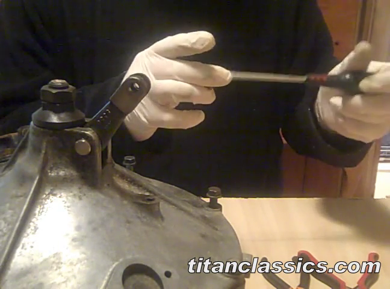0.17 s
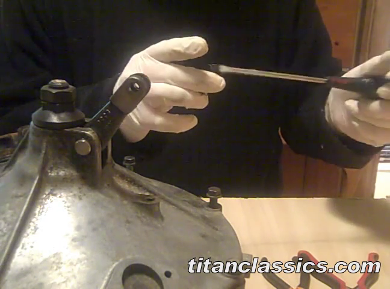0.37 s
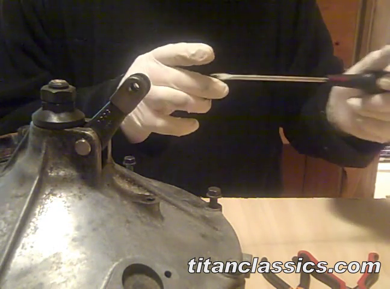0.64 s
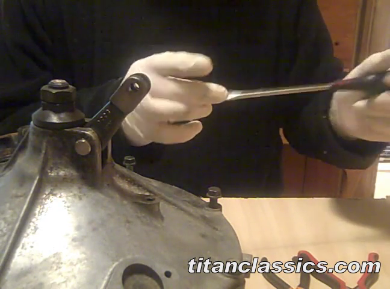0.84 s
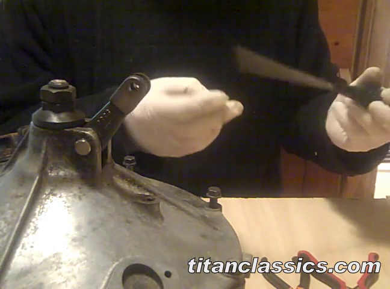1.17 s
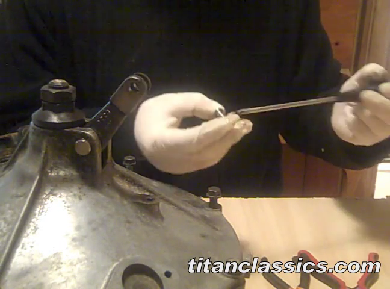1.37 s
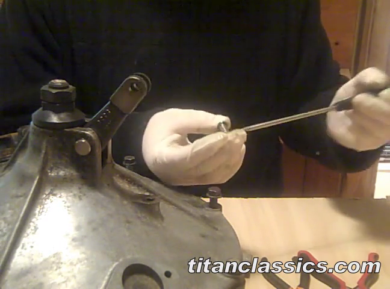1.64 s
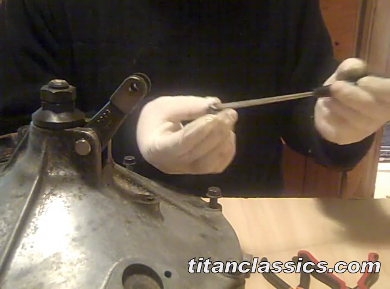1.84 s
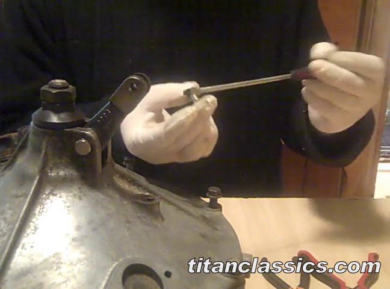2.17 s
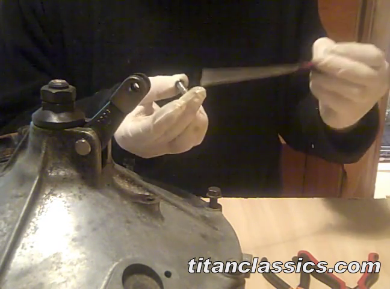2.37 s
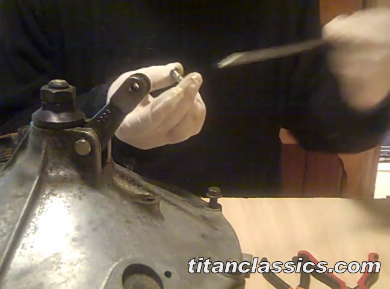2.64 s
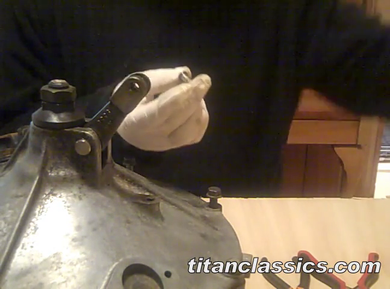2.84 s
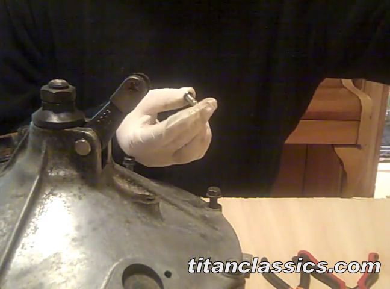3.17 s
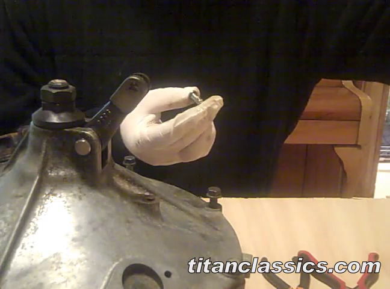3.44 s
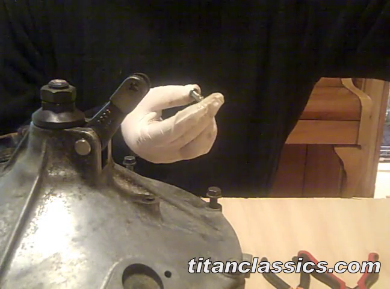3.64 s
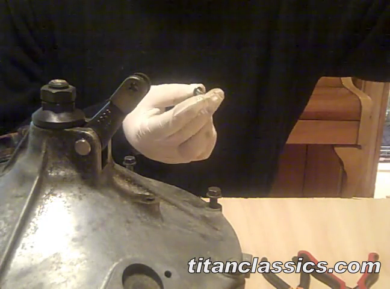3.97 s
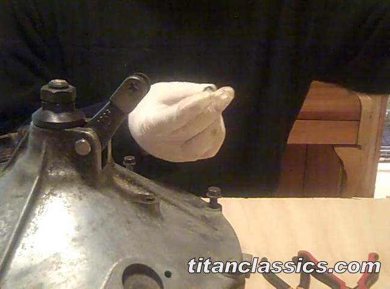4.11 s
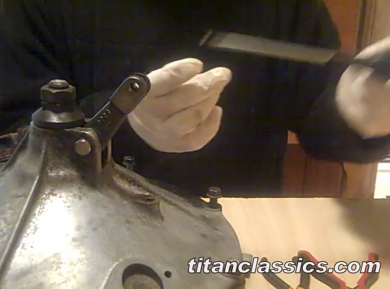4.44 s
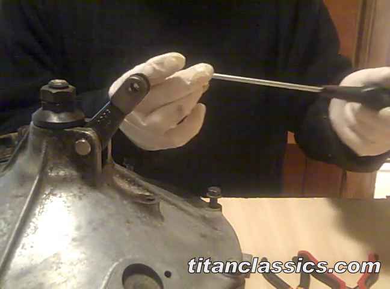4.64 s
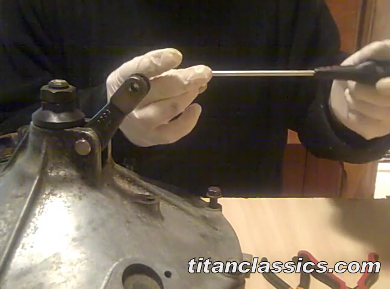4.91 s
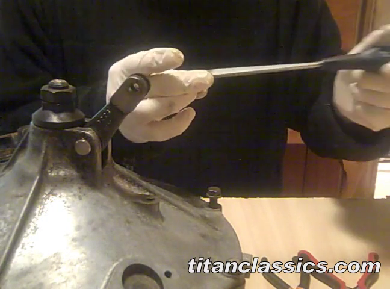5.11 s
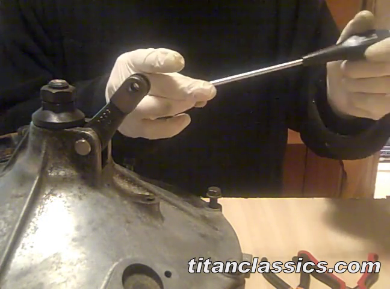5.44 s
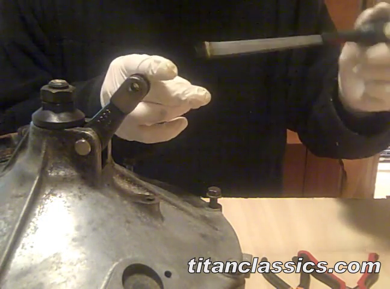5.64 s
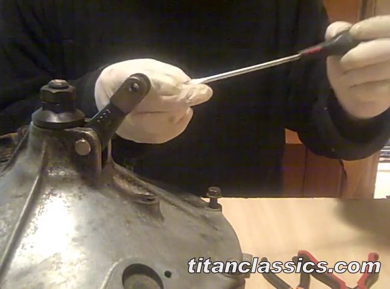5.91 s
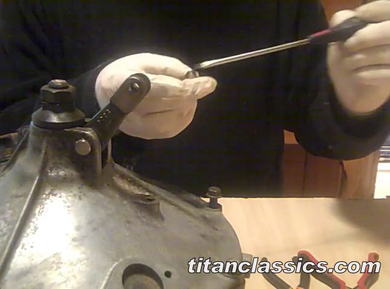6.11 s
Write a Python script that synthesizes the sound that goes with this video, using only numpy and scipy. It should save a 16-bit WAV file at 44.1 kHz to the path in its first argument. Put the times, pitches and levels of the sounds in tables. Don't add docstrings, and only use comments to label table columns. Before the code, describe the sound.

Faint greasy rubbing, then dry metallic clicks as a blade tip touches and skids on a little pin. Isolated hard taps alternate with softer nudges and tiny rattling ticks. A low, muffled wooden thump comes just past halfway, followed by small knocks and a brief lull, then a crunchy smear and renewed clicking. A nearby camera microphone hears it all over quiet, hissy room tone.

```python
import sys
import numpy as np
from scipy import signal
from scipy.fft import rfft, irfft, next_fast_len
from scipy.io import wavfile
from scipy.ndimage import map_coordinates

SR = 44100
rng = np.random.default_rng(int(sys.argv[2]) if len(sys.argv) > 2 else 0)


def materialize(psi):
    bounded = np.clip(np.atleast_2d(psi).T, -1, 1)
    quanta = np.round(bounded * 32767).astype(np.int16)
    wavfile.write(sys.argv[1], SR, quanta)


def ratio_of_db(decibels):
    return 10 ** (np.asarray(decibels, float) / 20)


N = 277080

# (time [s], peak [dB], tip ring [Hz], sideways bend [dB], glancing crunch [dB])
HARD_TAPS = [
    (0.2075, -16.5, 5450, -20, -39),
    (0.2566, -19, 5970, -17.5, -14),
    (0.2652, -19.5, 6350, -34, -12),
    (0.821, -15.5, 5940, -23, -20),
    (1.9097, -5.5, 6050, -20, -31),
    (2.539, -15, 7230, -20, 7),
    (4.2194, -11, 6040, -22, -9),
    (4.6293, -11.5, 7360, -27, -12),
    (4.969, -15, 6800, -26, -22),
    (5.5043, -16.5, 7050, -27, -19),
]
# (time [s], peak [dB], tip ring [Hz], sideways bend [dB])
NUDGES = [(0.0794, -34.5, 7100, -14), (0.9602, -29, 6740, -15), (1.0455, -30, 5800, -9),
          (1.5414, -27.5, 6900, -10), (1.9884, -31, 5570, -13), (3.2586, -31, 6400, -15),
          (3.3071, -24.5, 6340, -30), (3.3775, -37.5, 5160, -8), (3.8405, -32, 5460, -23.5),
          (4.0663, -37, 7100, -15.5), (5.09, -33, 5900, -9.5), (5.208, -29, 6600, -20),
          (5.6017, -27.5, 6300, -23), (5.7976, -28, 5660, -22), (5.8522, -32.5, 6800, -14.5)]
# (time [s], peak [dB], tip ring [Hz])
TICKS = [(0.136, -46, 5700), (1.0846, -38, 6140), (1.1254, -34, 6950), (1.16, -40.5, 6260),
         (2.165, -34.5, 6200), (2.2477, -44.5, 6500), (2.2846, -39, 6000), (2.759, -35, 7200),
         (2.778, -33, 7030), (2.8412, -34.5, 7360), (3.318, -34, 6050), (3.6916, -46, 4730),
         (4.1448, -34.5, 6400), (4.643, -30, 6800), (4.6563, -27, 6700), (4.659, -23.5, 6700),
         (5.29, -40, 6400), (6.026, -32.5, 7100), (5.8055, -52, 6200), (6.121, -38, 6020)]
# (time [s], pressure [dB])
DRAG_PRESSURE = [(0.0, -43.5), (0.19, -45), (0.38, -57.5), (0.89, -54), (1.0, -66.5), (1.22, -48),
                 (1.77, -52.5), (2.22, -46), (2.71, -56), (3.32, -51), (3.57, -60), (4.13, -54.5),
                 (4.29, -33), (4.46, -51), (5.18, -67), (5.7, -50), (5.96, -47), (6.28, -60.5)]
# (end [s], length [s], level [dB], sideways bend [dB])
STROKES = [(0.034, 0.18, -57, -3), (0.3, 0.013, -59, -6), (0.335, 0.022, -38.5, -9.5),
           (0.613, 0.067, -37, -12), (0.871, 0.039, -38, -9), (0.892, 0.035, -38, -17),
           (1.295, 0.012, -53, -9), (1.325, 0.029, -67, 5.5), (1.659, 0.096, -55, 3),
           (1.69, 0.048, -38.5, -8.5), (1.698, 0.028, -34, -9.5), (2.012, 0.049, -33.5, -9),
           (2.313, 0.033, -53, -21), (2.339, 0.023, -36.5, -21), (2.366, 0.046, -37.5, -15),
           (2.657, 0.072, -50, -10), (2.832, 0.52, -54.5, -11), (3.318, 0.047, -53.5, 2),
           (3.816, 0.14, -51.5, -12), (4.21, 0.18, -53.5, -6), (4.706, 0.052, -54, -2),
           (4.733, 0.075, -37, -14), (4.78, 0.094, -55, -9), (5.059, 0.054, -42.5, -11),
           (5.325, 0.068, -45.5, -10.5), (5.589, 0.059, -45.5, -8.5), (5.708, 0.07, -56.5, -6),
           (5.896, 0.014, -48, -5), (5.977, 0.051, -51, -10.5), (6.027, 0.094, -49.5, -9.5)]
# (time [s], t60 [s], level [dB], ring [Hz], width [Hz])
SKIDS = [(.213, 0.44, -63, 6000, 2000), (.271, 0.44, -58, 6400, 2000), (1.917, .5, -42, 6960, 2560),
         (2.336, 0.25, -34, 5930, 450), (2.545, 0.32, -55, 6770, 3000), (3.265, 1, -51, 6300, 2500),
         (3.845, .5, -49.5, 5460, 1020), (4.072, 0.55, -58, 6700, 1970), (4.226, 0.3, -30.5, 6330, 1500),
         (4.636, 0.67, -39, 6860, 2000), (4.63, 0.12, -40.5, 2240, 140), (4.69, 0.46, -48.5, 2195, 140),
         (4.633, 0.15, -45, 1046, 80), (4.70, 0.27, -41, 4500, 900), (4.975, 0.24, -53, 7160, 1990),
         (5.511, 0.74, -49, 7160, 2000)]
# (time [s], bench ring [dB], contact puff [dB])
THUMPS = [
    (3.257, -58, -39),
    (3.3767, -33.5, -33.5),
    (3.395, -58, -37.5),
    (3.43, -64, -39),
    (3.585, -50.5, -52),
    (3.64, -55, -70),
]
# (time [s], half length [s], lift [dB])
ARM_REACHES = [
    (1.45, 0.22, 1),
    (3.335, 0.24, 2),
    (4.39, 0.29, 3),
    (5.793, 0.19, 2.5),
]

# (frequency [Hz], width [Hz], level [dB])
TIP_MODES = [(4540, 1940, -19), (6360, 1100, -4), (7192, 130, -1.5), (7670, 370, -10.5)]
# (frequency [Hz], width [Hz], level [dB])
NECK_MODES = [(3220, 820, 0.5), (3372, 330, 6.5), (4800, 1870, -1.5)]
# (frequency [Hz], width [Hz], level [dB])
SHAFT_MODES = [(1030, 160, -9.5), (1500, 1230, -14), (2274, 600, -6.5)]
# (frequency [Hz], width [Hz], level [dB])
EDGE_MODES = [(8800, 1000, 4.5), (11180, 2100, -4), (12430, 210, 3.5)]
# (frequency [Hz], level [dB], t60 [s])
BENCH_MODES = [(123, -4.5, 0.18), (155.8, -6.5, 0.7), (169.6, -8.5, 0.35), (205, -19, 0.11),
               (247.7, -6, 0.26), (301, -12.5, 0.25), (424, -9, 0.31), (445, -27, 0.15), (590, -17, 0.1),
               (826, -9, 0.076)]

# (frequency [Hz], density [dB per Hz])
AIR_SPECTRUM = [(12, -45), (20, -18.5), (87, -5), (124, -2.5), (350, -2.5), (424, -6), (472, -4), (587, -5),
                (1070, -5.5), (1260, -7.5), (2230, -11), (3360, -9.5), (3650, -11), (11800, -19.5),
                (13500, -27)]
# (frequency [Hz], left-right likeness [0..1])
AIR_LIKENESS = [(60, 0.046), (230, 0.32), (890, 0.38), (3450, 0.055), (13300, 0.97)]
# (frequency [Hz], left-right difference [dB])
AIR_LEAN = [(60, 5), (300, 6.5), (1200, 3.5), (4000, 0.5), (13000, -3)]
# (frequency [Hz], left-right difference [dB])
PORT_LEAN = [(1000, -2), (3000, 0.5), (5800, -1.5), (6600, -0.5), (7600, 17), (9000, 3), (13000, 17)]
# (frequency [Hz], left lead [rad])
PORT_LEAD = [(3000, -0.45), (6700, -.1), (8200, -1.4), (12000, -1.2)]
# (frequency [Hz], t60 [s])
ROOM_DECAY = [(150, 1), (1000, 0.48), (3000, 0.6), (7000, 0.44), (11700, 0.48), (12300, 0.19)]


def unit(x):
    return x / np.sqrt(np.mean(x ** 2) + 1e-20)


def along(points, hz):
    f, v = np.transpose(points)
    return np.interp(np.log(hz + 1), np.log(f + 1), v)


def wobble(rate_hz):
    knots = rng.standard_normal(int(N * rate_hz / SR) + 4)
    return map_coordinates(knots, [np.arange(N) * rate_hz / SR])


def filtered(x, response):
    m = next_fast_len(x.shape[-1] + 8192)
    return irfft(rfft(x, m) * response(np.fft.rfftfreq(m, 1 / SR)), m)[..., :x.shape[-1]]


def sides(lean_db):
    return np.array([ratio_of_db(lean_db / 2), ratio_of_db(-lean_db / 2)])


def body(modes, top_hz=16000):
    def response(f):
        ring = 0
        for k, (hz, width_hz, db) in enumerate(modes):
            resonance = 1j * f * width_hz / (hz * hz - f * f + 1j * f * width_hz)
            ring = ring + (-1) ** k * ratio_of_db(db) * resonance
        return ring * (1j * f / (700 + 1j * f)) ** 2 / (1 + (f / top_hz) ** 7)
    return response


def tail(count):
    hz, t, z = signal.stft(rng.standard_normal((2, count)), SR, nperseg=256)
    decay = ratio_of_db(-60 * t / along(ROOM_DECAY, hz)[:, None])
    left, own = signal.istft(z * decay, SR, nperseg=256)[1]
    share = 0.33
    right = share * left + np.sqrt(1 - share ** 2) * own
    rise = 1 - np.exp(-np.arange(len(left)) / SR / 0.00075)
    return np.array([left, right]) * rise / np.linalg.norm(left)


def taps():
    tick_bend_db, soft_crunch_db, crunch_s = -26, -15, 0.00088
    out, t = np.zeros((2, N + SR)), np.arange(1024) / SR
    peak = lambda x: x / np.abs(x[0]).max()
    soft = NUDGES + [(*tick, tick_bend_db) for tick in TICKS]
    touches = HARD_TAPS + [(*touch, soft_crunch_db) for touch in soft]
    for s, db, hz, neck_db, crunch_db in touches:
        shaft_db = neck_db - 6.5
        edge_db = -29 + 12.5 * (hz / 1000 - 6)
        edge_db -= 5 * np.clip((-24 - db) / 10, 0, 1)

        contact = np.zeros((3, len(t)))
        contact[0, 132] = 1
        contact[0, 132 + rng.integers(18, 44)] = rng.uniform(.3, .6)
        contact[1:] = .09 * rng.standard_normal((2, len(t))) * np.exp(-np.abs(t - .0034) / .0013)
        crunch = rng.standard_normal(len(t)) * np.exp(-np.abs(t - .0036) / crunch_s)
        contact[0] += ratio_of_db(crunch_db) * crunch

        ring = body([(hz, 800, 6)] + TIP_MODES, top_hz=8430)
        tip = peak(filtered(contact, lambda f: ring(f) / (1 + (4300 / (f + 1)) ** 8)))
        shaft = ratio_of_db(shaft_db + 6.0) * peak(filtered(contact, body(SHAFT_MODES, top_hz=3030)))
        neck = ratio_of_db(neck_db + 8.0) * peak(filtered(contact, body(NECK_MODES, top_hz=4800)))
        edge = ratio_of_db(edge_db + 4.5) * peak(filtered(contact, body(EDGE_MODES)))
        blow, *chatter = ratio_of_db(db + 0.5) * (tip + shaft + neck + edge)

        bounce = ratio_of_db(-13) * np.array([np.roll(blow, 125), np.roll(blow, 139)])
        room = tail(count=SR // 2 if db > -20 else SR // 5)
        echo = signal.fftconvolve(blow[None], room, axes=1)
        at = round((s - .0022) * SR)
        out[:, at:at + len(t)] += blow + chatter + bounce
        out[:, at + 200:at + 200 + echo.shape[1]] += ratio_of_db(-4) * echo
    return out[:, :N]


def grit(per_second, spread_db, smooth):
    happens = rng.random(N) < per_second / SR
    size = ratio_of_db(spread_db * rng.exponential(1, N))
    slips = happens * size * rng.standard_normal(N)
    return unit(unit(slips) + smooth * rng.standard_normal(N))


def strokes():
    t = np.arange(N) / SR
    press_db = np.interp(t, *np.transpose(DRAG_PRESSURE))
    low_db = -14 - 0.41 * (press_db + 56.5)
    gains = ratio_of_db(press_db - 8.5 + np.array([0 * low_db, low_db, low_db + 2.0, low_db + 3.0]))
    for end, length, db, bend_db in STROKES:
        near = slice(max(round((end - 2 * length) * SR), 0), round((end + .05) * SR))
        ago = t[near] - end
        rise = np.exp(-(ago / (0.5 * length)) ** 2)
        release = np.exp(-np.abs(ago) / 0.0053)
        swell = np.where(ago < 0, rise, release)
        part_db = np.array([0, bend_db - 8.5, bend_db, -17.5])
        gains[:, near] += ratio_of_db(db + part_db)[:, None] * swell
    return gains


def drag():
    slips = grit(per_second=1500, spread_db=2.5, smooth=1.0)
    slips = slips * ratio_of_db(1.5 * wobble(70))
    tip, shaft, neck, edge = strokes()
    upper = 0.44 * tip * (edge / tip / ratio_of_db(-13.5)) ** 0.28
    parts = [(0.74 * tip, body(TIP_MODES[:2], top_hz=7600)),
             (upper, body(TIP_MODES[2:], top_hz=8550)),
             (shaft, body(SHAFT_MODES, top_hz=3000)),
             (neck, body(NECK_MODES, top_hz=5000)),
             (edge, body(EDGE_MODES[:2]))]
    rub = np.zeros(N)
    for gain, part in parts:
        rub += gain * unit(filtered(slips, lambda f: part(f) * np.abs(part(f)) ** 0.097))
    echo = np.zeros((2, N + SR))
    for at in np.arange(0, N, SR // 4):
        piece = signal.fftconvolve(rub[None, at:at + SR // 4], tail(count=SR // 2), axes=1)
        echo[:, at:at + piece.shape[1]] += piece
    return rub + ratio_of_db(-3.5) * echo[:, :N]


def skids():
    out, t = np.zeros((2, N + SR)), np.arange(SR // 2) / SR
    slips = np.array([grit(per_second=1500, spread_db=2.2, smooth=.9) for _ in range(3)])
    for s, t60, db, hz, width_hz in SKIDS:
        at = round(s * SR)
        pair = 0.78 * slips[0, at:at + len(t)] + slips[1:, at:at + len(t)]
        ring = unit(filtered(pair, lambda f: body([(hz, width_hz, 0)])(f) ** 2))
        out[:, at:at + len(t)] += ratio_of_db(db - 60 * t / t60) * (1 - np.exp(-t / 0.0022)) * ring
    return out[:, :N]


def thump():
    out, t = np.zeros((2, N + SR)), np.arange(SR // 2) / SR
    dull = lambda f: 1 / (1 + 1j * f / 600) / (1 + (f / 2200) ** 4)
    for s, ring_db, puff_db in THUMPS:
        ring = np.zeros(len(t))
        for hz, level_db, t60 in BENCH_MODES:
            ring += ratio_of_db(level_db - 60 * t / t60) * np.sin(2 * np.pi * hz * t + rng.normal(0, 0.31))
        rattle = unit(filtered(rng.standard_normal((2, len(t))), dull))
        puff = ratio_of_db(-60 * t / 0.015) * rattle[0]
        lingering = ratio_of_db(-17.5 - 60 * t / 0.37) * (rattle + 1.3 * rattle[0])
        knock = ratio_of_db(ring_db) * ring + ratio_of_db(puff_db) * (puff + lingering)
        knock = sides(0.29)[:, None] * knock * (1 - np.exp(-t / 0.001))
        echo = signal.fftconvolve(knock, tail(count=SR // 2), axes=1)[:, :len(t)]
        at = round(s * SR)
        out[:, at:at + len(t)] += knock + ratio_of_db(-14) * echo
    return filtered(out[:, :N], lambda f: (1j * f / (60 + 1j * f)) ** 4)


def air():
    def mid_side(hz):
        turn = np.arccos(np.clip(along(AIR_LIKENESS, hz), -1, 1)) / 2
        return ratio_of_db(along(AIR_SPECTRUM, hz)) * [np.cos(turn), np.sin(turn)]
    mid, side = filtered(rng.standard_normal((2, N)), mid_side)
    pair = filtered(np.array([mid + side, mid - side]), lambda hz: sides(along(AIR_LEAN, hz)))
    t = np.arange(N) / SR
    lift_db = sum(db * np.exp(-((t - s) / half_s) ** 2) for s, half_s, db in ARM_REACHES)
    rest_db = -62
    return ratio_of_db(rest_db + lift_db + 4 + 0.72 * wobble(5.61)) * unit(pair)


def scene():
    def ports(hz):
        lag = np.exp(.5j * along(PORT_LEAD, hz) * np.array([[1], [-1]]))
        return sides(along(PORT_LEAN, hz)) * lag
    return filtered(taps() + skids() + drag(), ports) + thump() + air()


def starved(x, under_db):
    mid_side = np.array([x[0] + x[1], x[0] - x[1]]) / 2
    hz, _, z = signal.stft(mid_side, SR, nperseg=1536)
    bands = np.abs(z[:, :768]).reshape(2, 64, 12, -1).mean(axis=2)
    band_hz = hz[:768:12, None]
    edge_db = 14 * np.clip((band_hz - 12300) / 600, 0, 1)
    need_db = under_db + edge_db + 4 * rng.standard_normal(bands.shape)
    need = bands[:, 6:].max(axis=(0, 1)) * ratio_of_db(need_db)
    keep = ((bands > need) | (band_hz < 8800)).astype(float)
    keep[:, 4] = np.where(bands[:, 4] > ratio_of_db(11) * need[:, 4], 1, .5)
    z[:, :768] *= np.repeat(keep, 12, axis=1)
    mid, side = signal.istft(z, SR, nperseg=1536)[1][:, :N]
    return np.array([mid + side, mid - side])


def roll_off(x):
    return signal.sosfilt(signal.butter(12, 13910, fs=SR, output="sos"), x)


def record(dry):
    top_hz = 12900
    kept = filtered(dry, lambda hz: np.where(hz < top_hz, 1, ratio_of_db(-30 - (hz - top_hz) / 40)))
    return roll_off(starved(kept, under_db=-30.5))


dry = scene()
out = record(dry)
materialize(out)
```